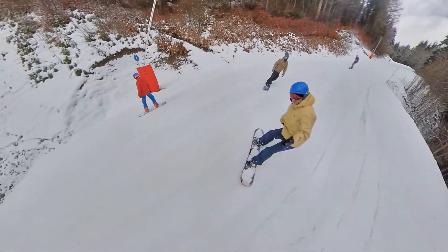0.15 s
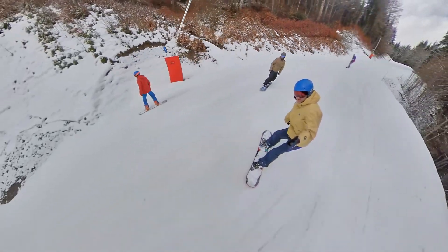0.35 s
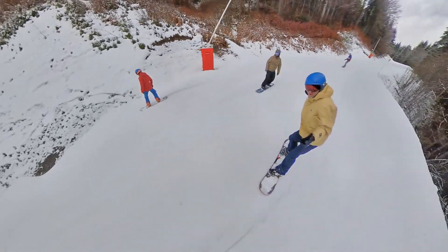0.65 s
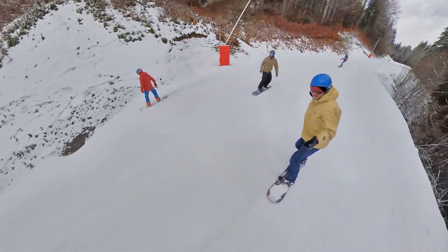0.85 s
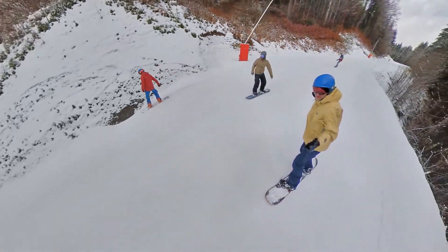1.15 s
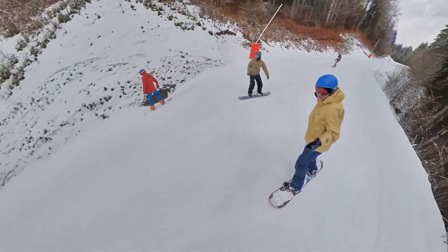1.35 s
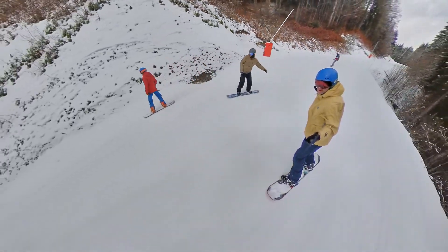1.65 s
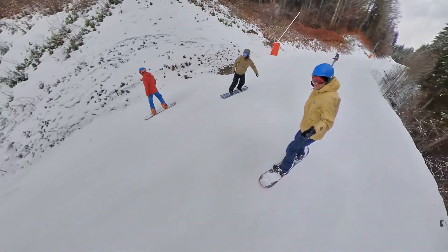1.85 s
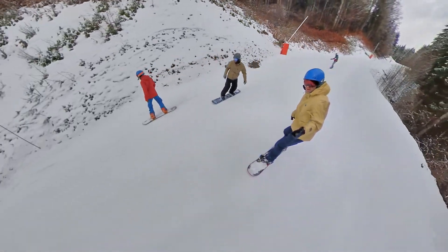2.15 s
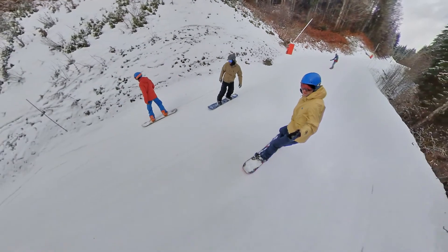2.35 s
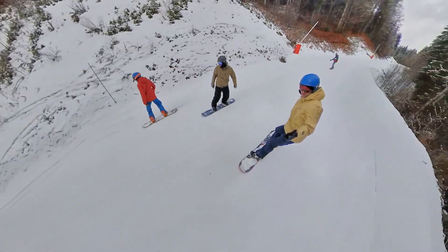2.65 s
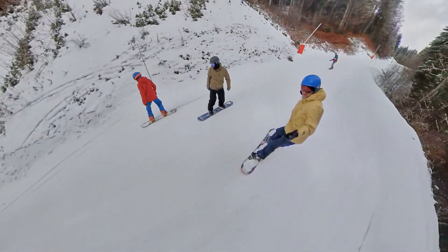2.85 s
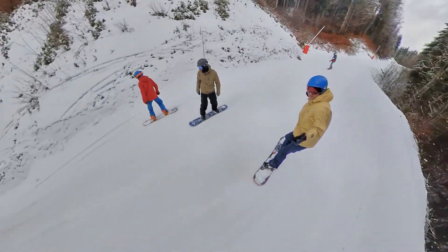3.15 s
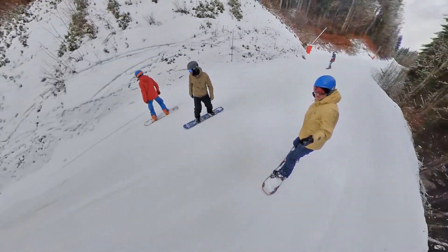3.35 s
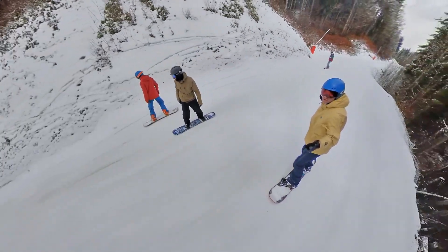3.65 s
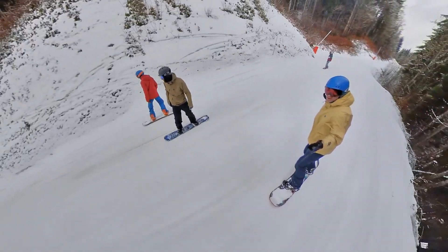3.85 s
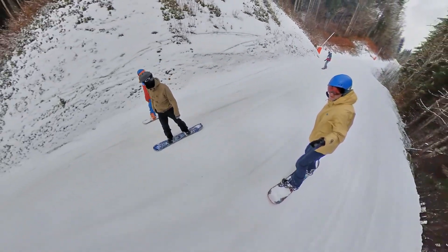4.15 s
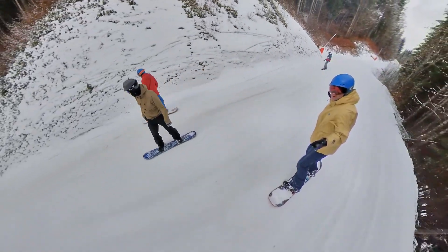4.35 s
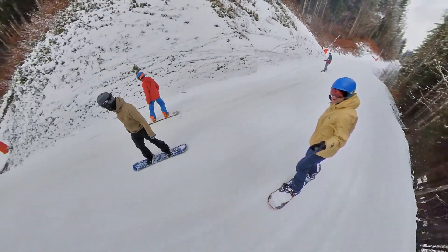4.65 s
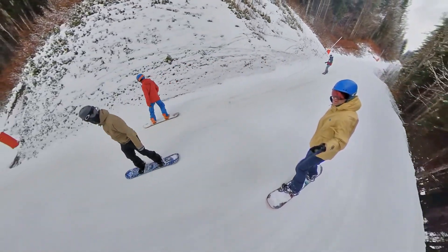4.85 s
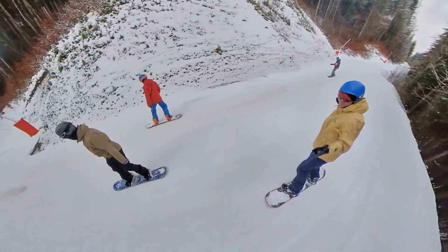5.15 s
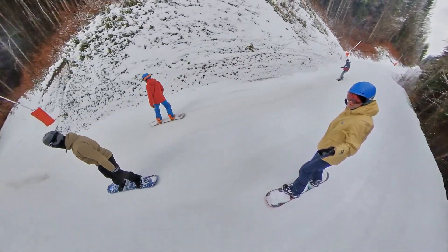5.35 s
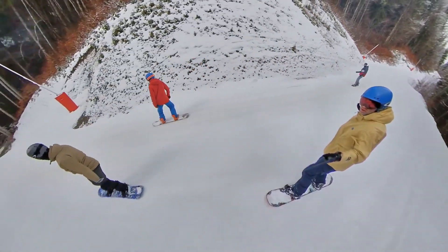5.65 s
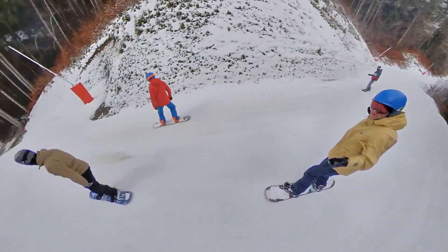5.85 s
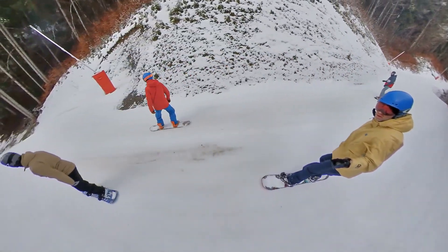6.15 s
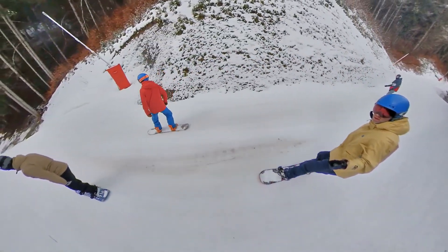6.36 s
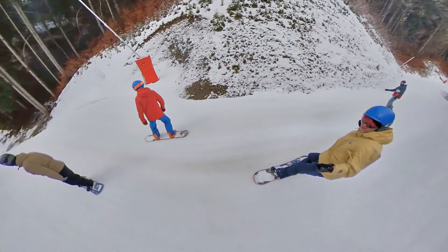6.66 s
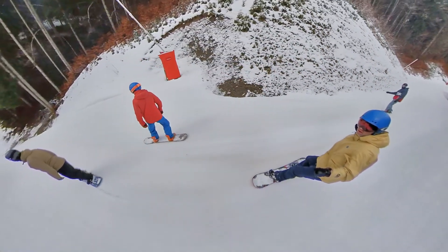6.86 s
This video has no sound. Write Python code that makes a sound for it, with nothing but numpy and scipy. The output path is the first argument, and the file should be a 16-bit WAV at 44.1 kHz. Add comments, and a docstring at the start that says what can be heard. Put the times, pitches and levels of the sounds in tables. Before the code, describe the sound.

Outdoors on a snowy slope, wind strikes a moving camera's two microphone ports very closely. From 0 to 1.5 s the right side rumbles and rushes unevenly, with abrupt pops and crackles; a bassy gust thumps left at 0.5 s. The airy rush swells at 1.6-1.9 s, then nearly drops out around 2-2.3 s. Hollow fluttering rings near 1 kHz cluster at 2.4-2.9 s. A strong bright rush rises at 3.1-3.3 s with thumping left gusts until 3.6 s, followed by scattered bursts and a softer swell around 4.5 s. After 5.2 s steady wind falls away, leaving gaps between warbling, throaty pops at 5.5-6 s, very loud knocks near 6.1-6.35 s, and a dense ringing flutter at 6.6-6.8 s. Beneath, faint snowboard edges scrape and fine snow sprays, most noticeable after 6 s, especially around 6.6 s on the right.

```python
"""Wind beats on the right port of a two-port camera microphone, on a pole carried down a slope with snowboarders.
There it rumbles, sings near 1 kHz and rushes: coloured noise in bursts, with short ringing eddies on top.
Separate gusts hit the left port, noise with a bass thump; their low end leaks through the housing to the right.
Under the wind the board edges scrape and spray over firm snow, as noise that wavers in level."""
import sys
import numpy as np
from scipy import signal
from scipy.fft import rfft, irfft
from scipy.io import wavfile
from scipy.ndimage import uniform_filter1d

SR = 44100
rng = np.random.default_rng(int(sys.argv[2]) if len(sys.argv) > 2 else 0)


def to_wav(s):
    """Save 16-bit WAV."""
    ch = np.atleast_2d(s).T  # columns
    pcm = np.round(np.clip(ch, -1, 1) * 32767)  # PCM
    wavfile.write(sys.argv[1], SR, pcm.astype(np.int16))


N = 309405  # samples, about 7 s

# Steady wind right at the right port. Each row: time in seconds, rumble, port ring and rush in dB.
RIGHT_WIND = [(0.0, -32.5, -35, -32), (0.2, -37.5, -34, -41), (0.55, -29, -30, -22.5),
              (0.78, -31, -36, -32), (0.95, -27.5, -39.5, -50.5), (1.2, -27, -31.5, -31.5),
              (1.45, -38, -35, -30.5), (1.87, -30, -26, -20.5), (1.9, -35.5, -42, -35),
              (2.02, -60, -56.5, -60), (2.34, -52, -52, -93), (2.45, -36, -30.5, -68),
              (2.94, -40.5, -33.5, -37.5), (2.99, -46, -42, -34), (3.11, -38, -29, -17.5),
              (3.25, -29, -29, -19), (3.46, -43, -37.5, -36.5), (4.06, -39.5, -33, -38),
              (4.5, -36.5, -30, -26), (5.0, -38.5, -44.5, -33.5), (5.22, -57, -41.5, -61.5),
              (5.3, -60, -59, -93), (5.43, -72, -50, -104), (6.4, -71, -46, -65), (7.01, -38.5, -33.5, -49)]
# Bursts of wind at the right port. Each row: start in seconds, hold in seconds, rumble, port ring and rush in dB.
RIGHT_BURSTS = [(0.205, 0.043, -28, -28.5, -46), (0.296, 0.0092, -23, -24, -33),
                (0.415, 0.004, -22, -24, -27), (0.447, 0.014, -27.5, -45, -27.5),
                (0.67, 0.05, -23.5, -27.5, -35), (4.465, 0.017, -38, -56, -22.5),
                (1.125, 0.0052, -21, -21, -27), (1.255, 0.071, -32.5, -31, -41),
                (1.307, 0.047, -47, -16.5, -20), (2.46, 0.015, -42, -43, -26),
                (2.58, 0.057, -47, -23.5, -45.5), (2.665, 0.024, -25, -18.5, -37),
                (2.86, 0.023, -24, -43, -27), (2.974, 0.01, -57, -59, -18.5),
                (3.565, 0.017, -13.5, -20.5, -31.5), (3.726, 0.014, -47, -28, -30),
                (3.838, 0.013, -31.5, -25, -35), (3.945, 0.0094, -28, -27, -26),
                (4.1, 0.035, -30.5, -27.5, -36), (4.2, 0.028, -22.5, -22.5, -28.5),
                (4.305, 0.04, -42, -38, -48), (5.08, 0.0068, -37, -33, -71),
                (5.16, 0.0032, -31, -32, -31.5), (5.207, 0.0062, -26.5, -37, -42),
                (5.445, 0.017, -29, -25, -53), (5.606, 0.0066, -24.5, -17, -30.5),
                (5.945, 0.056, -34, -31, -41), (6.109, 0.001, -17, -13, -21.5),
                (6.255, 0.03, -17, -10, -24), (6.345, 0.016, -13.5, -11, -22.5),
                (6.41, 0.0032, -27.5, -27, -41), (6.645, 0.14, -29.5, -20.5, -50),
                (6.78, 0.049, -22.5, -22.5, -30.5), (6.9, 0.043, -36.5, -36, -40.5)]
BURST_RISE_DB_S, BURST_FALL_DB_S = 2603, 1003
# Colours of the wind in the right port. Each row: frequency in Hz, relative level in dB.
RUMBLE_COLOUR = [(30, -19.5), (120, -14), (250, -1.5), (420, 6.5), (700, 0), (1500, -52)]
RING_COLOUR = [(150, -40), (700, -2.5), (1080, -3.5), (1450, -6), (2200, -15), (5000, -53.5)]
RUSH_COLOUR = [(300, -16.5), (1800, 4.5), (3200, 5.5), (6000, -5.5), (16000, -33)]


def right_port():
    """One train of swirls shakes rumble, ring and rush together; the rush is low-passed, higher when louder."""
    steady = np.array(curves(RIGHT_WIND))
    rumble, ring, rush = steady + surges(RIGHT_BURSTS, BURST_RISE_DB_S, BURST_FALL_DB_S)
    swirls = np.minimum(walk(70), 1)
    ticks = np.clip(walk(700), 0, 2) ** 2
    gappy = 1 / (1 + rush / undb(-23.0))  # a strong rush closes up into an even hiss

    hiss = turbulence(gappy * (3.7 * swirls + 4.44 * ticks), RUSH_COLOUR)
    air = low_pass_by_level(hiss, rush)
    low = turbulence(gappy * 6.3 * swirls, RUMBLE_COLOUR)
    singing = turbulence(gappy * (3.3 * swirls + 5.3 * walk(160)), RING_COLOUR)
    return rumble * low + ring * singing + rush * air + eddies()


# Single strong eddies right at the right port.
# Each row: time of the peak in seconds, nominal peak in dB, ring in Hz, length at half height in ms.
PORT_EDDIES = [(0.207, -10, 940, 1.2), (0.668, -5.5, 516, 0.99), (0.816, -14, 415, 3.6),
               (0.997, -7, 370, 2.4), (1.127, -8, 715, 0.25), (1.173, -11, 890, 0.89),
               (1.341, -3, 1990, 1.2), (1.459, -11, 2420, 0.27), (2.084, -30, 1150, 1.4),
               (2.157, -25, 1080, 2.1), (2.222, -17, 1270, 3), (2.298, -30, 1090, 4.3),
               (2.331, -26.5, 1100, 1), (2.379, -13, 1260, 1.5), (2.397, -12, 1130, 4.1),
               (2.429, -9.5, 1050, 2.5), (2.447, -14, 1230, 3.1), (2.459, -4.5, 880, 2),
               (2.469, -1, 880, 1.9), (2.479, -5, 855, 2.5), (2.544, -9, 1120, 1.6), (2.576, -7, 1130, 1.6),
               (2.675, -1.5, 1010, 1), (2.814, -5.5, 970, 0.72), (2.86, -3.5, 640, 1.3),
               (2.88, -17, 3170, 0.49), (2.975, -12, 4900, 0.093), (2.982, -22, 4000, 0.75),
               (3.74, -14.5, 1800, 1.1), (3.948, -14, 870, 0.85), (4.13, -11, 1030, 1.1),
               (4.198, -6, 1080, 1.1), (4.212, -1, 1220, 0.43), (4.283, -14, 3000, 0.74),
               (4.313, -5.5, 2340, 0.75), (4.329, -10, 1040, 1.2), (4.469, -13, 2120, 0.31),
               (5.123, -17, 1320, 0.77), (5.211, -12, 2010, 1), (5.455, -15.5, 710, 4.4),
               (5.484, -22.5, 1310, 4.7), (5.508, -6.5, 886, 2.6), (5.53, -10.5, 1090, 2.2),
               (5.544, -19.5, 1180, 3.5), (5.565, -27, 1040, 6.1), (5.577, -23, 1130, 6.5),
               (5.591, -12.5, 1030, 7.5), (5.611, -4, 1095, 3.1), (5.625, -14.5, 1000, 2),
               (5.67, -18.5, 1050, 2.8), (5.716, -6.5, 1140, 4.3), (5.738, -9, 1090, 2),
               (5.87, -6.5, 1108, 5.7), (5.907, -22.5, 1140, 3.5), (5.953, -3, 1166, 3.9),
               (5.979, -11.5, 970, 2.6), (6.113, 0.5, 940, 1.7), (6.29, -13, 1180, 1.5),
               (6.35, -1.5, 1120, 1.6), (6.616, -13.5, 1010, 6.8), (6.631, -10.5, 1080, 5.9),
               (6.652, -5.5, 984, 8.5), (6.667, 1, 965, 1.1), (6.696, -11, 890, 4), (6.722, -11, 970, 4),
               (6.743, -9, 1140, 3.5), (6.762, -5, 1150, 3.1), (6.795, -6.5, 760, 4.8)]
# Colour of the wake behind an eddy. Each row: frequency in Hz, relative level in dB.
WAKE_COLOUR = [(100, -25.5), (500, -1), (1100, 1), (1900, -10.5), (4500, -51)]


def eddies(wake_db=-13.0, wake_s=0.011, crackle_db=-18.0):
    """Each eddy rings the port in a brief swell and leaves a ragged wake that dies away."""
    tone, puffs, wake = np.zeros(N), np.zeros(N), np.zeros(N)
    t = np.arange(-600, 2400) / SR  # s around each peak
    waver = 0.00013 * walk(300)  # the ring runs early or late, in s
    turns = rng.random(len(PORT_EDDIES))  # starting phases, in cycles
    for (s, db, hz, ms), turn in zip(PORT_EDDIES, turns):
        at = int(s * SR) + np.round(t * SR).astype(int)
        swell = .5 ** ((2000 * t / ms) ** 2)
        cycles = hz * (t + waver[at]) + turn
        tone[at] += undb(db) * swell * np.cos(2 * np.pi * cycles)
        puffs[at] += undb(db) * swell
        wake[at] += undb(db) * np.where(t < 0, swell, np.exp(-t / wake_s))

    # the cube lets mainly strong eddies break up into treble
    crackle = undb(crackle_db) * puffs ** 3 * turbulence(0, RUSH_COLOUR)
    ragged = undb(wake_db) * wake * turbulence(5.2 * walk(250), WAKE_COLOUR)
    return tone * undb(3.2 * walk(600)) + crackle + ragged


EDGE_HZ = 6000  # top edge of the rush at -30 dB
EDGE_OCT_PER_DB, EDGE_DB_PER_OCT = 0.9, 12  # climb of the edge with level, slope above it


def low_pass_by_level(x, gain):
    """Low-pass the rush at an edge that follows its level, within limits."""
    f, t, z = signal.stft(x, SR, nperseg=256)
    smooth_gain = uniform_filter1d(gain, size=2048)
    db = 20 * np.log10(np.interp(t * SR, np.arange(N), smooth_gain))
    climb = np.clip(EDGE_OCT_PER_DB * (db + 30), -.6, .22)  # octaves
    above = np.log2((f[:, None] + 1) / EDGE_HZ) - climb
    cut = undb(-EDGE_DB_PER_OCT * np.clip(above, 0, 1.2))
    return signal.istft(z * cut, SR, nperseg=256)[1][:N]


# Gusts right at the left port. Each row: start in seconds, hold in seconds, level in dB.
LEFT_GUSTS = [(0.51, 0.075, -17.5), (0.7, 0.043, -33), (0.82, 0.033, -36), (0.95, 0.0035, -37),
              (1.01, 0.03, -28), (1.125, 0.0056, -22), (1.19, 0.0092, -37), (1.62, 0.11, -28.5),
              (1.7, 0.033, -24.5), (3.19, 0.049, -16), (3.415, 0.018, -19.5), (3.443, 0.008, -23),
              (3.49, 0.02, -24.5), (3.567, 0.015, -22), (4.59, 0.085, -37.5), (4.67, 0.11, -30),
              (4.94, 0.0061, -33), (5.77, 0.16, -36.5), (5.97, 0.48, -44), (6.28, 0.011, -33),
              (6.335, 0.009, -25), (6.48, 0.23, -36), (6.78, 0.021, -31.5)]
GUST_RISE_DB_S, GUST_FALL_DB_S = 1086, 501
LINGER_DB, LINGER_FALL_DB_S = -23.5, 95  # a faint draught outlasts each gust
THUMP_DB, THUMP_HZ = 16, 109  # gain on the cubed flow, top of the bass
# Colour of a gust in the left port. Each row: frequency in Hz, relative level in dB.
GUST_COLOUR = [(30, -32.5), (150, -9), (320, -0.5), (600, -1), (1500, -14), (3000, -20), (9000, -66.5)]


def left_port():
    """Gusts with their own swirls; the bass grows with the cube of the flow, so the strong ones thump."""
    gust = surges(LEFT_GUSTS, GUST_RISE_DB_S, GUST_FALL_DB_S)[0]
    draught = undb(LINGER_DB) * surges(LEFT_GUSTS, GUST_RISE_DB_S, LINGER_FALL_DB_S)[0]
    flow = gust + draught
    bass = signal.butter(2, THUMP_HZ, fs=SR, output="sos")
    thump = unit(signal.sosfilt(bass, rng.standard_normal(N)))
    swirling = turbulence(1.84 * walk(150) + 2.67 * walk(60), GUST_COLOUR)
    return flow * swirling + undb(THUMP_DB) * flow ** 3 * thump


# Boards on the snow, under the wind. Each row: time in seconds, spray at the left and the right port in dB.
BOARD_SPRAY = [(0.0, -72, -53), (1.0, -76, -68), (1.45, -59.5, -59), (1.65, -59.5, -47), (2.03, -84, -76.5),
               (2.68, -70, -49.5), (3.08, -80, -50.5), (3.9, -70.5, -50.5), (5.03, -83.5, -59),
               (5.35, -64.5, -67.5), (6.05, -47.5, -44), (6.33, -56.5, -42.5), (6.4, -60, -64),
               (6.47, -48.5, -44), (6.62, -47.5, -32), (6.77, -47, -44), (6.86, -59, -49), (7.01, -60, -46)]
SCRAPE_DB = -39.5  # level of the edge scrape when the left spray is at -48 dB
# Colours of the edges and of the flying snow. Each row: frequency in Hz, relative level in dB.
SCRAPE_COLOUR = [(500, -14.5), (2000, -12.5), (5000, -10), (11000, -33)]
SPRAY_COLOUR = [(2500, 2.5), (8000, 0), (13500, -9.5), (15500, -5.5)]


def boards():
    """The scrape has its own noise at each port; one fine spray reaches both, mostly louder on the right."""
    spray = np.array(curves(BOARD_SPRAY))
    scrape = undb(SCRAPE_DB) * (spray[0] / undb(-48)) ** 1.76  # the edge bites as the spray grows
    grain_db = 2.5 * walk(25)
    edges = scrape * np.array([turbulence(grain_db, SCRAPE_COLOUR) for _ in range(2)])
    return edges + spray * turbulence(2.0 * walk(22.88), SPRAY_COLOUR)


def turbulence(flutter_db, shape):
    """Swirling air or snow as noise that flutters in level, then takes a colour."""
    return colour(undb(flutter_db) * rng.standard_normal(N), shape)


def surges(table, rise_db_s, fall_db_s):
    """Each row rises to its levels, holds and falls, straight in dB; the strongest rules. Gains per sample."""
    t, out = np.arange(N) / SR, -200.
    for s, hold, *db in table:
        before, after = rise_db_s * (s - t), fall_db_s * (t - s - hold)
        under = np.maximum(np.maximum(before, after), 0)
        out = np.maximum(out, np.array(db)[:, None] - under)
    return undb(out)


def curves(table):
    """Columns of a table in dB joined by straight lines, as gains per sample."""
    s, *columns = np.transpose(table)
    return [undb(np.interp(np.arange(N) / SR, s, c)) for c in columns]


def colour(x, shape):
    """Filter by a spectrum of (Hz, dB) points; rms 1."""
    hz, db = np.transpose(shape)
    f = np.maximum(np.fft.rfftfreq(N, 1 / SR), 1)
    gain = undb(np.interp(np.log(f), np.log(hz), db))
    return unit(irfft(rfft(x) * gain, N))


def walk(rate):
    """Random levels held 1 / rate s and smoothed twice; rms 1."""
    k = max(int(SR / rate), 2)
    held = np.repeat(rng.standard_normal(N // 2 + 1)[:N // k + 1], k)
    return unit(uniform_filter1d(uniform_filter1d(held, k), k)[:N])


def unit(x):
    """Scale to rms 1."""
    return x / np.sqrt(np.mean(x ** 2))


def undb(db):
    """Decibels to gain."""
    return 10 ** (np.asarray(db) / 20)


def scene():
    """Both ports over the boards; the low end of a left gust also reaches the right through the housing."""
    left = left_port()
    housing = signal.butter(1, 900, fs=SR, output="sos")
    through = undb(-9.0) * signal.sosfilt(housing, left)
    return np.array([left, right_port() + through]) + boards()


def record(dry):
    """The camera rounds the loudest peaks and cuts the top above 15750 Hz."""
    top = signal.ellip(12, .2, 90, 15750, fs=SR, output="sos")
    return signal.sosfilt(top, np.tanh(dry))


dry = scene()
out = record(dry)
to_wav(out)
```